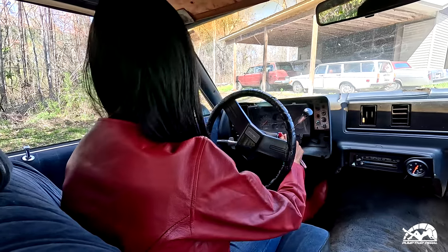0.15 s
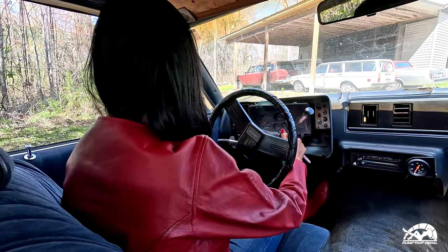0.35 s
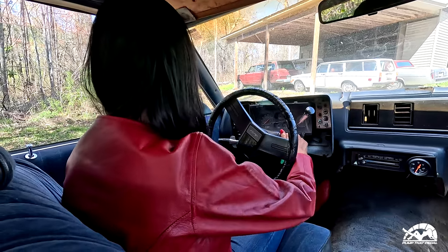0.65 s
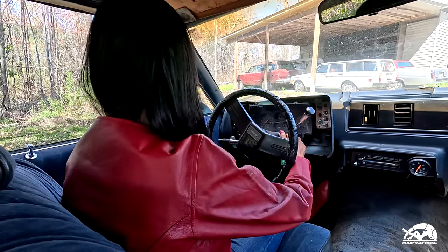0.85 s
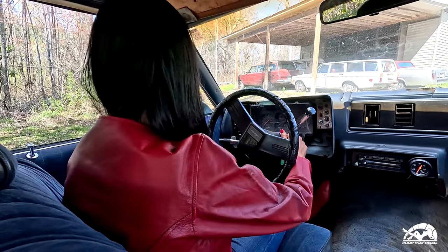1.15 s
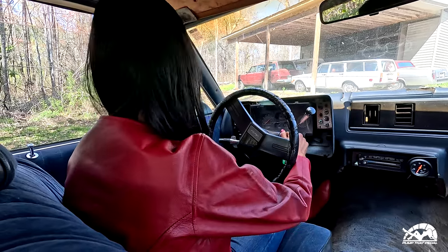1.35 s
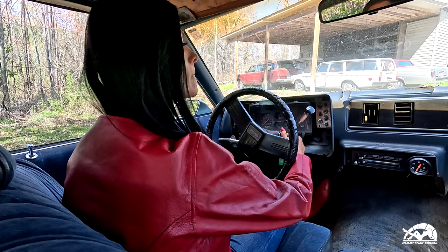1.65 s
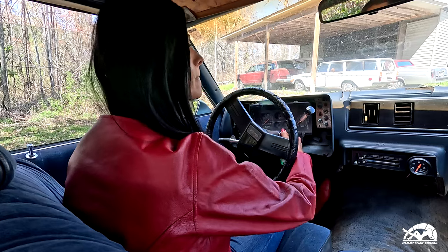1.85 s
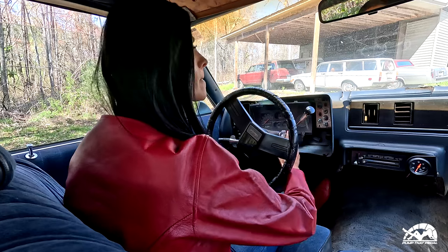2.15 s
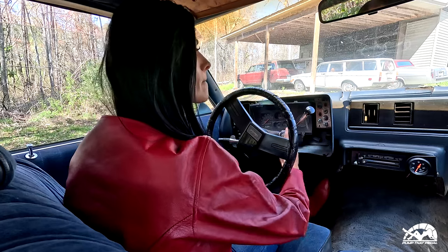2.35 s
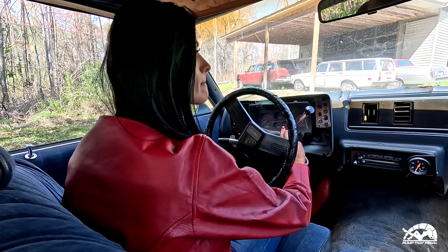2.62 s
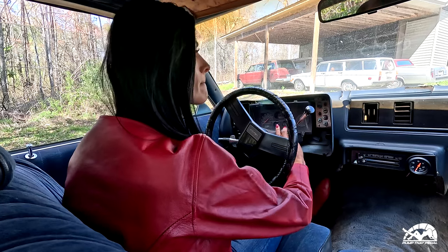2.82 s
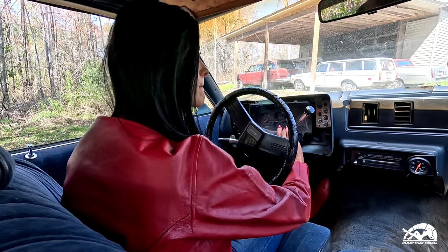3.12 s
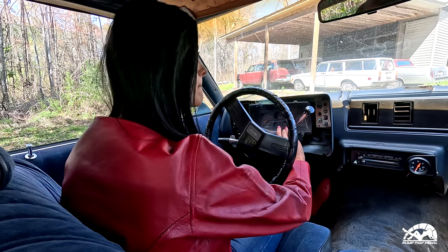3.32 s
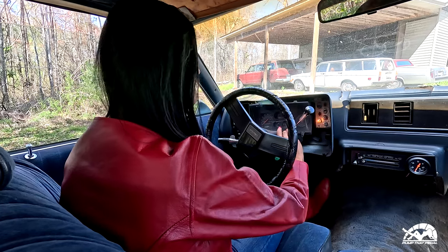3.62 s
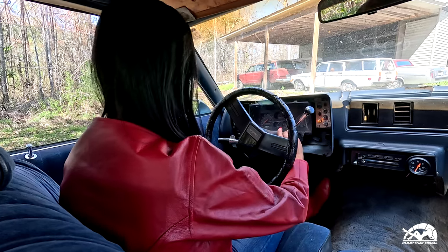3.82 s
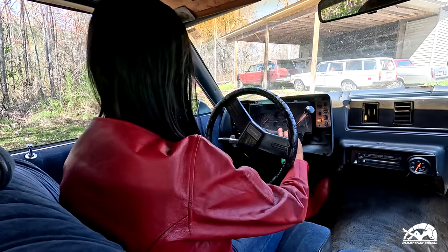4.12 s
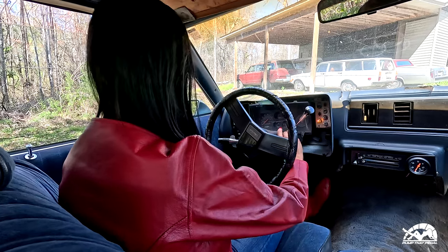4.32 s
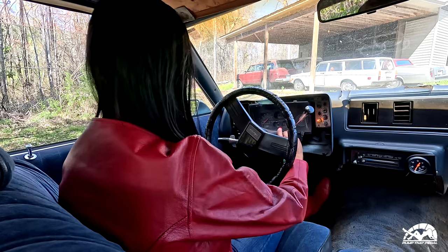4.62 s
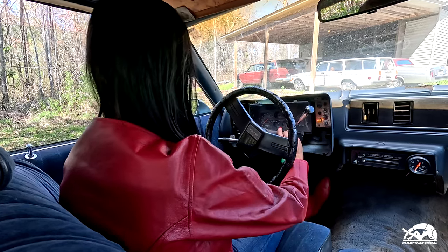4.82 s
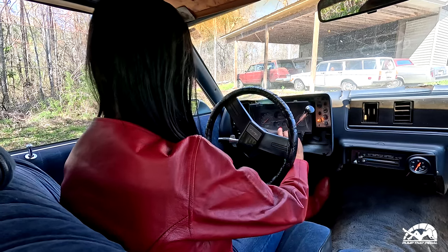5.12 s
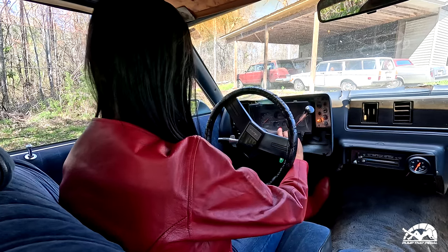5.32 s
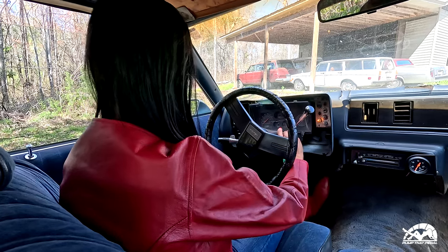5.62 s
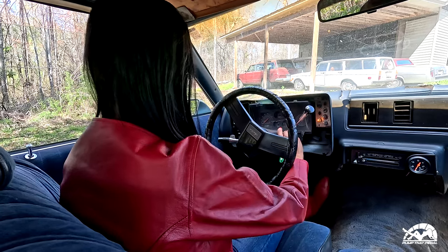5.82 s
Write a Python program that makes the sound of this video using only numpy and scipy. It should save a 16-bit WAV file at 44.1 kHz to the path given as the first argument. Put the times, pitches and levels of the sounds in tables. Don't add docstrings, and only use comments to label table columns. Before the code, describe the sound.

Keys clink and jingle in a quiet parked car, then a starter slams in and cranks the engine with a grinding whine, never firing.

```python
import sys
import numpy as np
from scipy import signal
from scipy.fft import rfft, irfft
from scipy.io import wavfile
from scipy.ndimage import uniform_filter1d

SR = 44100
rng = np.random.default_rng(int(sys.argv[2]) if len(sys.argv) > 2 else 0)


def waveform_to_disk(signal):
    frames = np.transpose(np.atleast_2d(signal))
    scaled = np.clip(frames, -1, 1) * 32767
    samples = np.round(scaled).astype(np.int16)
    wavfile.write(sys.argv[1], SR, samples)


def undo_db(level):
    steps = np.asarray(level, float) / 20
    return 10 ** steps


N = 262836
T = np.arange(N) / SR

# start_s, load_db, grind_db (over the whine), tooth_rate_hz (at the bite),
# swell_db (over the stroke)
STROKES = [(4.217, -34, -2, 574, -7), (4.27, -36, -4, 592, 3), (4.342, -35, -8, 585, -2),
           (4.42, -35, -9.5, 569, 0), (4.472, -35, -8.5, 584, -1), (4.536, -36, -8, 577, 4),
           (4.608, -36, -8, 575, 2), (4.688, -36, -14, 560, 0), (4.74, -35, -2.5, 584, -4),
           (4.805, -35, -7.5, 585, 2), (4.87, -35, -6.5, 581, 0), (4.946, -37, -11, 563, 2),
           (5.003, -33.5, -7, 581, -5), (5.065, -36, -8, 580, 2), (5.139, -37, -5.5, 575, -2),
           (5.208, -38, -12.5, 560, 2), (5.272, -36, -3, 586, -2), (5.335, -37.5, -5, 586, 2),
           (5.402, -38, -6, 584, 5), (5.488, -37, -12, 557, 0), (5.531, -36, -8.5, 579, 0),
           (5.597, -37, -7.5, 578, 5), (5.676, -36, -10, 566, -1), (5.757, -36, -14, 551, 1),
           (5.806, -35.5, -9, 576, 2), (5.877, -35, -9, 577, 4), (5.945, -35, -9, 570, 0)]
# start_s, load_db, start_hz, end_hz (tooth rate), grind_db
SPIN_UP = [
    (3.777, -32, 408, 400, -5),
    (3.897, -39, 332, 345, -8),
    (3.922, -36, 345, 312, -4),
    (3.955, -38, 280, 215, -9),
    (4.022, -45, 343, 370, -11),
    (4.058, -41, 380, 398, -10),
    (4.075, -36.5, 399, 402, -10),
    (4.112, -38, 410, 414, -8),
    (4.157, -39, 534, 528, -7),
    (4.187, -40, 552, 560, -7),
]
# pitch_hz, width_hz, level_db
KEY_MODES = [(2550, 70, -14), (5120, 35, 0), (5500, 50, -4), (6200, 40, -5), (7000, 50, -3), (7350, 40, -1),
             (8260, 40, -6), (8720, 35, -3)]


def evened(x):
    return x / np.sqrt(np.mean(x ** 2) + 1e-20)


def read(points, hz):
    f, value = np.transpose(points)
    return np.interp(np.log(hz + 1), np.log(f + 1), value)


def curves(rows):
    s, *columns = np.transpose(rows)
    return [np.interp(T, s, column, left=-120) for column in columns]


def coloured(x, points):
    hz = np.fft.rfftfreq(len(x), 1 / SR)
    beyond_db = -24 * np.log2(np.maximum(hz / points[-1][0], 1))
    return evened(irfft(rfft(x) * undo_db(read(points, hz) + beyond_db), len(x)))


def drift(hz):
    return evened(signal.sosfilt(signal.butter(2, hz, fs=SR, output="sos"), rng.standard_normal(N)))


def resonate(x, hz, width):
    r = np.exp(-np.pi * width / SR)
    turn = 2 * np.pi * hz / SR
    return signal.lfilter([1 - r], [1, -2 * r * np.cos(turn), r * r], x) * 2 * np.sin(turn)


def muffled(x, hz):
    return signal.sosfilt(signal.butter(4, hz, fs=SR, output="sos"), x)


def add(mix, s, sound):
    part = mix[round(s * SR):][:len(sound)]
    part += sound[:len(part)]


def strokes():
    # speed_loss_hz (of tooth rate), rise_s
    cylinders = [(16, .009), (14, .016), (25, .022), (7, .019), (22, .008), (20, .017), (21, .022),
                 (4, .018)]
    rows = [(*row, .012, 0) for row in SPIN_UP]
    for k, (s, load_db, grind_db, hz, swell_db) in enumerate(STROKES):
        loss, rise = cylinders[k % len(cylinders)]
        rows.append((s, load_db, hz, hz - loss, grind_db, rise, swell_db))
    return np.transpose(rows)


def gear_whine(turns, hz, stall_db, on):
    # pitch_hz, level_db
    teeth_path = [(220, 8), (320, 5), (405, 0), (460, 7), (530, -8), (555, 4), (572, -4), (590, -6),
                  (800, -9), (1110, 6), (1145, -2), (1180, 9), (1240, -1), (1400, -3), (1670, -2.5),
                  (2270, -4), (2700, 1), (2850, -3), (3380, -2), (3520, -10), (4000, -9), (4550, -15),
                  (5000, -11), (5640, -7), (5850, -10), (6300, -30), (7500, -20), (9000, -50)]
    flutter = drift(33.3)
    whine = 0
    for m in range(1, 17):
        tilt = np.maximum(1 - m * hz / 900, np.clip(m * hz / 1200 - 3, -1, -.1))
        level = undo_db(read(teeth_path, m * hz) + stall_db * tilt)
        rough = 1 + .55 * np.roll(flutter, 9001 * m)[on]
        uneven = .3 * np.sqrt(m) * np.roll(flutter, 4003 * m + 2000)[on]
        whine = whine + level * rough * np.cos(2 * np.pi * (m * turns + rng.random()) + uneven)
    return whine


def bell_housing(scrape):
    # pitch_hz, width_hz, level_db
    bell_modes = [(1075.5, 93, -0.5), (1190, 35, 2), (1746.8, 42, -8.5), (2259, 126, -1), (2800, 94, -5),
                  (3405, 40, -4), (5650, 110, -4.5), (4990, 120, -14), (456, 20, -8), (951, 20, -8),
                  (2685, 40, -5), (3666, 40, -12), (4300, 100, -14)]
    return evened(sum(undo_db(db) * evened(resonate(resonate(scrape, f, w), f, 4 * w)) for f, w, db in bell_modes))


def starter():
    # pitch_hz, level_db (per Hz)
    grind_colour = [(180, -48), (300, -21), (562, 2.5), (775, -29.5), (1160, -5), (1320, -16), (1730, -0.5),
                    (1880, -19), (2250, -6), (2480, -12), (2760, -1), (3400, -3), (3600, -11), (3900, -6),
                    (4150, -14), (4400, -6), (4650, -14), (5000, -8), (5400, -15), (5690, -6),
                    (8780, -22.5), (13500, -50)]
    s, load_db, start_hz, end_hz, grind_db, rise, swell_db = strokes()
    start = s - rise / 2
    k = np.clip(np.searchsorted(start, T) - 1, 0, len(s) - 1)
    age = T - start[k]
    gone = np.clip(age / np.diff(start, append=start[-1] + 0.039)[k], 0, 1)
    bite = np.clip(age / rise[k], 0, 1)
    spinning_up = k < len(SPIN_UP)

    slack_db = 14 * np.where(spinning_up, .45, 1)
    slack = (1 + 2 * (k == 0)) * (1 - np.sin(np.pi / 2 * bite)) + gone ** 3.99
    level_db = load_db[k] + swell_db[k] * (2 * gone - .5) - slack_db * slack
    level_db = level_db - 320 * np.minimum(age, .05) * (k == 0)
    linger = np.exp(-1 / (0.00579 * SR))
    load = signal.lfilter([1 - linger], [1, -linger], undo_db(level_db) * (age > 0))

    extra_loss = 1 + 1.2 * np.clip(T - 5.3, 0, .35) * (T < 5.75)
    lost = np.where(spinning_up, gone ** .6, extra_loss * (1 - np.exp(-(age / .03) ** 2)))
    on = slice(np.argmax(age > 0), N)
    hz = uniform_filter1d(start_hz[k] + (end_hz - start_hz)[k] * lost, 300)[on]
    hz = hz * (1 + .007 * (565 / hz) ** 2.5 * drift(45)[on])
    turns = np.cumsum(hz) / SR
    meshed = k[on] > 0

    whine = gear_whine(turns, hz, 9 * np.log2(565 / hz) * meshed, on)
    tooth = 1.4 + np.exp(-(turns % 1) / 0.16)
    scrape = tooth * rng.standard_normal(len(hz)) * undo_db(1.286 * drift(97)[on])
    grind = coloured(scrape, grind_colour)
    after = age - rise[k]
    clash = .011 / rise[k] * np.exp(-np.maximum(after, 0) / 0.01343) * (after > 0)
    clash = 0.7305 + .85 * clash[on]

    out = np.zeros(N)
    bell_db = -6 + 7 * np.log2(hz / 565) * meshed
    out[on] = undo_db(-2) * evened(whine * clash ** .6) + undo_db(bell_db) * bell_housing(scrape)
    out[on] *= (load[on] / load[-SR:].mean() + .01) ** .02
    out[on] += undo_db(grind_db[k][on] + 1) * grind * clash
    return load * out, load


def rocking(load):
    # time_s, sway_db, twist_db
    rock_moves = [(3.77, -60, -51.5), (3.83, -14, -26), (3.92, -31.5, -34), (3.99, -39.5, -23),
                  (4.08, -31.5, -40), (4.17, -21, -27.5), (4.26, -21, -27.5), (4.46, -23, -35.5),
                  (4.59, -32.5, -33.5), (4.72, -29.5, -27), (4.85, -21, -27.5), (4.98, -23, -33),
                  (5.11, -21, -30.5), (5.35, -22.5, -28), (5.5, -31.5, -35.5), (5.63, -24.5, -32.5),
                  (5.89, -24.5, -32), (5.96, -32, -33.5)]
    # pitch_hz, level_db (per Hz)
    shudder_colour = [(40, -48.5), (55, 1.5), (75, -7), (110, -8.5), (140, -19), (190, -58)]
    # pitch_hz, level_db (per Hz)
    rattle_colour = [(90, -26.5), (140, 0.5), (230, -0.5), (300, -8), (500, -17), (1000, -15),
                     (1400, -28.5)]
    s = np.array(STROKES)[::4, 0]
    pace = np.gradient(s) / 4
    angle = 2 * np.pi * np.cumsum(1 / np.interp(T, s, pace)) / SR
    angle = angle - np.interp(s[2], T, angle)
    sway_db, twist_db = curves(rock_moves)
    shudder_db = twist_db - 6 * (abs(T - 4) < .11)
    rattle_db = np.where(load > 0, -42.5 + 0.283 * (twist_db + 31), twist_db)

    first = undo_db(-11.0) * np.cos(angle - 2.6)
    second = np.cos(2 * angle + 0.957 + 0.557 * drift(8.77))
    third = np.cos(3 * angle - 2.2 + 0.557 * drift(3.56))
    hum = np.cos(7 * angle + drift(5.4)) * np.clip((T - s[0]) / .1 + 1, 0, 1)
    shudder = coloured(rng.standard_normal(N), shudder_colour) + 0.614 * hum
    beat = (load / load[-SR:].mean() + 0.016) ** 0.8
    rattle = coloured(rng.standard_normal(N), rattle_colour) * beat
    out = undo_db(sway_db + 3) * (second + first) + undo_db(twist_db + 2) * third
    return out + undo_db(shudder_db - 1.5) * shudder + undo_db(rattle_db) * rattle


def clinks(bright, dull, shanks):
    # start_s, peak_db, ring_hz, dull_db
    loose = [(.3461, -54.5, 2396, -2), (.398, -48, 8500, -20), (.4172, -40.5, 3304, -5.5),
             (.4723, -51.5, 1880, -13.5), (.5593, -47.5, 7300, -11.5), (.719, -52, 5100, -12),
             (.7716, -49, 2090, -3), (.7885, -40.5, 9070, -18.5), (.8599, -58, 7600, -11),
             (.9333, -42, 3180, -7), (1.405, -52, 1730, -6), (1.7388, -22.5, 3850, -10),
             (2.0036, -37, 5530, -5.5), (2.0204, -31.5, 7120, -11), (2.0811, -28.5, 7550, -8),
             (2.1836, -47, 5440, -8), (2.2127, -38, 5100, -17), (2.3082, -44, 2530, -8.5),
             (2.382, -40.5, 6900, -8.5), (2.4376, -34, 2730, -4.5), (2.553, -52, 1960, 6),
             (2.7367, -50, 7150, -9.5), (2.765, -49, 7200, -10), (2.9235, -52.5, 4960, -9),
             (3.029, -45.5, 1850, -4), (3.1193, -51, 2510, 4), (3.1816, -29, 5300, -15.5),
             (3.4105, -56.5, 1930, -3), (3.4595, -54.5, 7080, -9.5), (3.6696, -56.5, 6820, -15.5)]
    # start_s, peak_db, ring_hz, dull_db
    snaps = [(.4738, -35, 7600, -24.5), (.9133, -53, 2030, -5.5), (1.698, -43.5, 9460, -15.5),
             (1.786, -48, 7300, -20), (1.798, -46, 7300, -20), (1.8567, -48.5, 2800, -31),
             (1.9624, -49.5, 3470, 15.5), (2.3487, -35.5, 5120, -20), (2.4286, -38, 5110, -3.5),
             (2.494, -32.5, 5470, -12), (2.6705, -33, 5840, -35), (2.802, -50, 7120, -22),
             (2.9369, -29, 3500, 2), (3.1442, -21, 3990, -10.5), (3.199, -38, 5250, -14),
             (3.3553, -47.5, 8000, -15.5)]
    # start_s, peak_db, ring_hz, dull_db
    drags = [(.377, -50.5, 3700, -1.5), (.6315, -54, 2530, -5), (.734, -53, 6400, -4.5),
             (2.8464, -44, 7700, -10), (3.048, -40, 8720, -14), (3.5134, -55.5, 7520, -24.5),
             (3.7454, -54, 7300, -20), (3.764, -54, 3000, 0)]
    # start_s, peak_db, ring_hz, dull_db
    ticks = [(1.935, -50, 7300, -20), (2.048, -42, 7350, -12), (2.073, -38, 7400, -14),
             (2.112, -42, 8260, -10), (2.14, -46, 7360, -15), (2.252, -44, 8700, -15),
             (2.27, -45, 5120, -15), (2.2926, -44, 7050, -18), (2.374, -43, 6200, -12),
             (2.396, -42, 8260, -12), (2.42, -41, 5120, -12), (2.453, -38, 7400, -8),
             (2.471, -40, 5500, -12), (2.579, -56, 5500, -15), (2.86, -48, 7350, -5), (3.075, -50, 1650, 0),
             (3.089, -47, 7350, -10), (3.214, -46, 5120, -6), (3.241, -54, 7350, -15),
             (3.545, -56, 7350, -20)]
    lock_modes_hz = [1650, 2050, 2600, 3000, 3450]
    rise = .0035
    out, t = np.zeros(N), np.arange(6000) / SR
    onset = 1 - np.exp(-(t / rise) ** 2)
    for table, t60 in [(loose, 0.136), (snaps, 0.0791), (drags, 0.3), (ticks, .07)]:
        for s, db, hz, dull_db in table:
            two = rng.integers(1, len(shanks))
            one = np.argmin([abs(f - hz) for f, _, _ in KEY_MODES]) if hz > 4500 else two
            part = slice(round(s * SR), round(s * SR) + len(t))
            body = (np.exp(-t / 0.009) + undo_db(-14)) * undo_db(-60 * t / t60)
            struck = undo_db(-9) * evened(muffled(resonate(rng.standard_normal(len(t)), hz, 220), 10000))
            hard_db = .25 * (db + 40)
            ring = .2 * undo_db(-2 * max(hard_db, 0) - 60 * t / .1)
            ring = ring * (shanks[one][part] + .5 * shanks[two][part])
            lock_hz = lock_modes_hz[two % len(lock_modes_hz)]
            barrel = .6 * dull[part] + undo_db(-5) * evened(resonate(dull[part], lock_hz, 220))
            scrape = .45 * bright[part] + undo_db(dull_db) * barrel + struck
            add(out, s - rise / 2, undo_db(db) * onset * (body * scrape + ring))
    return out


def jingle(bright, dull, shanks):
    # peak_s, peak_db, fall_s (to rise or fall by 10 dB)
    shakes = [(.15, -84, .15), (.4, -73.5, 0.0646), (.62, -69.5, 0.0573), (.96, -78, .11),
              (1.22, -79, 0.1051), (1.55, -73.5, 0.0738), (1.8, -66, 0.0943), (2.01, -60, 0.0443),
              (2.099, -57, 0.0373), (2.232, -55, 0.03), (2.4, -59, 0.04), (2.48, -63, 0.0363),
              (2.725, -67, .045), (2.9, -73, 0.03), (3.11, -68, 0.0383), (3.2, -64, 0.0038),
              (3.4, -74, .055), (3.751, -72, 0.09)]
    touch = undo_db(4 * np.minimum(rng.exponential(1, N), 5)) * (rng.random(N) < 350 / SR)
    which = rng.integers(0, len(KEY_MODES), N)
    pings = evened(sum(undo_db(db) * resonate(touch * (which == k), f, w) / w
                       for k, (f, w, db) in enumerate(KEY_MODES)))
    rustle = np.roll(bright + undo_db(-8) * dull + 0.12 * sum(shanks), SR)
    rustle = rustle * undo_db(4.34 * drift(47))
    shaken = sum(undo_db(db - 10 * abs(T - s) / fall) for s, db, fall in shakes)
    return shaken * (rustle + undo_db(-3) * muffled(pings, 8600))


def keys():
    # pitch_hz, level_db
    bright_colour = [(2000, -17), (3500, -13), (5500, -0.5), (8500, -1.5), (10500, -11), (13000, -14),
                     (16000, -28)]
    # pitch_hz, level_db
    dull_colour = [(400, -28), (900, -31), (1500, -3), (2800, -1.5), (4300, -4.5), (6500, -40)]
    a, b, c = rng.standard_normal((3, N))
    shanks = [undo_db(db) * evened(muffled(resonate(b, f, w), 9480)) for f, w, db in KEY_MODES]
    bright = coloured(a, bright_colour) * undo_db(2.21 * drift(280))
    dull = coloured(c, dull_colour)
    return clinks(bright, dull, shanks) + jingle(bright, dull, shanks)


def knocks():
    # start_s, peak_db, pitch_hz, t60_s (to fall by 60 dB), top_db
    blows = [(0.188, -31, 221.5, 0.17, -29.5), (0.418, -43.5, 151, 0.142, -1.5),
             (0.464, -44.5, 160.7, 0.172, -3), (0.774, -39.5, 153, 0.205, -10),
             (0.942, -38.5, 149, 0.186, -31), (0.983, -34.5, 166.4, 0.105, -5.5),
             (1.197, -58, 172, 0.072, 5.5), (1.406, -44, 153, 0.082, -19.5),
             (1.739, -33.5, 158.4, 0.121, -45), (1.966, -37.5, 172, 0.149, -12.5),
             (2.582, -38.5, 201, 0.059, -12), (2.943, -41, 217, 0.155, -26), (3.154, -37, 300, 0.12, -4),
             (3.427, -48, 173.3, 0.177, -10), (3.787, -25.5, 250.5, 0.1044, -3),
             (3.786, -35, 1215, .13, -10), (3.83, -31, 150, .25, -22), (4.158, -26, 175, 0.2, -13),
             (4.16, -40, 1085, .12, -20), (4.165, -33, 320, .16, -15), (4.185, -33, 230, .12, -15),
             (4.09, -36, 375, .12, -20), (4.11, -43, 1670, .15, -20), (3.795, -36, 620, .15, -6),
             (3.81, -36, 400, .15, -10), (3.905, -43, 960, .3, -20), (3.965, -35, 458, .25, -12)]
    out, t = np.zeros(N), np.arange(8000) / SR
    for s, db, hz, t60, top_db in blows:
        noise = rng.standard_normal(len(t))
        panel = evened(resonate(resonate(noise, hz, 45), hz, 135))
        wood = evened(muffled(resonate(resonate(noise, 1040, 930), 1010, 900), 3000))
        top = undo_db(top_db - 40 * t / t60) * wood
        add(out, s, undo_db(db - 2.5 - 60 * t / t60) * (1 - np.exp(-t / 0.0013)) * (panel + top))
    return out


def cabin():
    # time_s, springs_db (car on its springs), seat_db (seat and floor)
    seat_moves = [(0, -43, -56), (.15, -48, -46), (.3, -35, -48.5), (.5, -40, -46), (.75, -44, -49),
                  (.9, -39, -46), (1.15, -39, -55), (1.5, -44, -53), (1.68, -37, -52.5), (1.93, -51, -50),
                  (2.15, -39, -49), (2.4, -38, -52), (2.57, -48, -46.5), (2.86, -31, -50), (3.01, -46, -54),
                  (3.15, -38.5, -43), (3.3, -31.5, -50.5), (3.6, -44, -49.5)]
    # pitch_hz, level_db
    boom_colour = [(14, -70.5), (24, 15.5), (34, 11.5), (48, 7), (65, -0.5), (90, -56.5)]
    # pitch_hz, level_db
    body_colour = [(45, -5), (65, 2), (110, -2), (160, -5), (220, -7), (300, -26), (450, -30), (800, -72.5)]
    # pitch_hz, level_db
    air_colour = [(300, -9), (600, -13), (880, -14), (1050, -4), (1400, -9), (2000, -17), (3500, -25),
                  (6000, -26.5), (9000, -35), (11000, -43.5), (13000, -77.5)]
    boom_db, body_db = curves(seat_moves)
    a, b, c = rng.standard_normal((3, N))
    boom = undo_db(boom_db) * coloured(a, boom_colour)
    body = undo_db(body_db + 2 * drift(7.2)) * coloured(b, body_colour)
    air = undo_db(-66.5 + 2.24 * drift(16)) * coloured(c, air_colour)
    return boom + body + air


def ports(x):
    # pitch_hz, side_db (side minus middle)
    wide = [(25, -45.5), (60, -36), (200, -22), (700, -16), (1300, -7.5), (2400, -13.5), (4400, -12),
            (8000, -26), (14000, 3)]
    # pitch_hz, lag_radians
    lag = [(100, 0.039), (1100, 0.464), (2900, 0.826), (5500, 0.444), (9000, 0.51)]
    # pitch_hz, lean_db
    lean = [(250, 0), (550, -.5), (1100, 4.5), (2000, 0), (4500, -.8)]
    # pitch_hz, level_db
    mic = [(9000, 0), (11000, -5.5), (13000, -4.5), (14500, -11), (15500, -19), (16000, -36)]
    hz = np.fft.rfftfreq(N, 1 / SR)
    taps = rng.standard_normal(3000) * np.exp(-np.arange(3000) / 900)
    apart = undo_db(read(wide, hz)) * rfft(taps / np.linalg.norm(taps), N)
    half = np.exp(-.5j * read(lag, hz)) * undo_db(.5 * read(lean, hz))
    return irfft(rfft(x) * undo_db(read(mic, hz)) * np.array([half + apart, 1 / half - apart]), N)


def scene():
    whine, load = starter()
    return ports(whine + rocking(load) + keys() + knocks() + cabin())


def low_pass(x):
    return signal.sosfilt(signal.butter(12, 15570, fs=SR, output="sos"), x)


def record(dry):
    return low_pass(dry)


dry = scene()
out = record(dry)
waveform_to_disk(out)
```